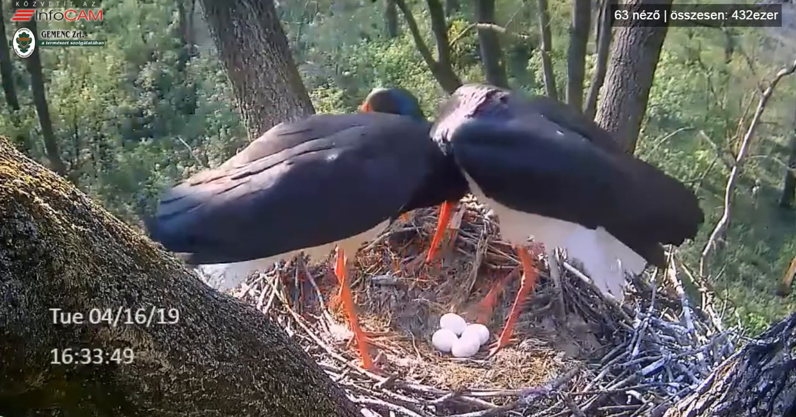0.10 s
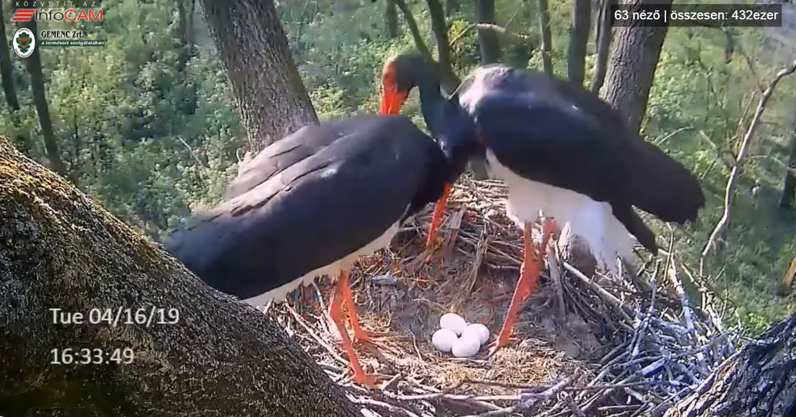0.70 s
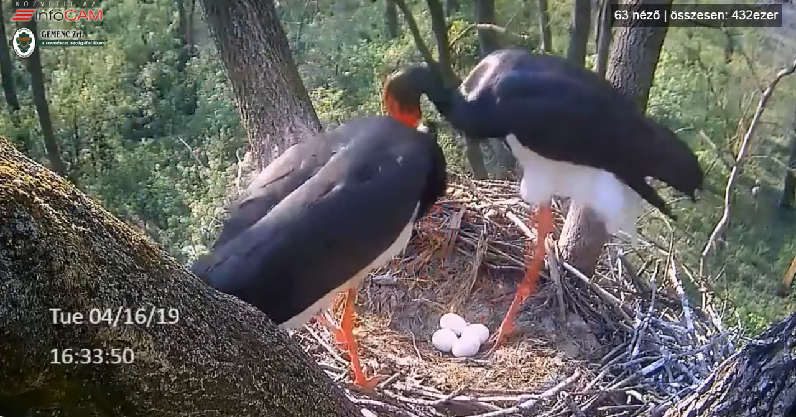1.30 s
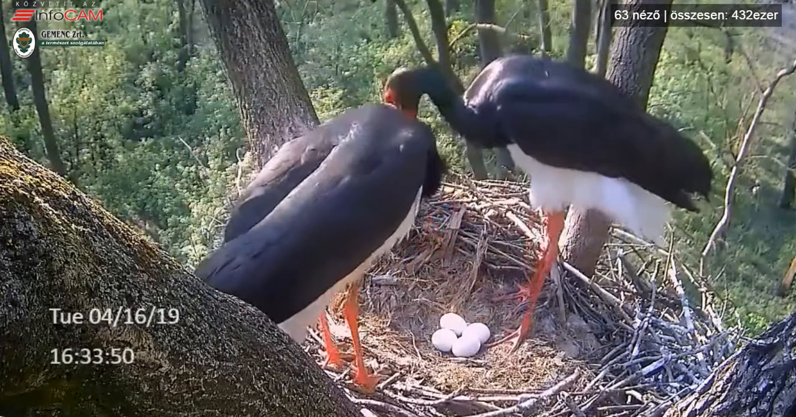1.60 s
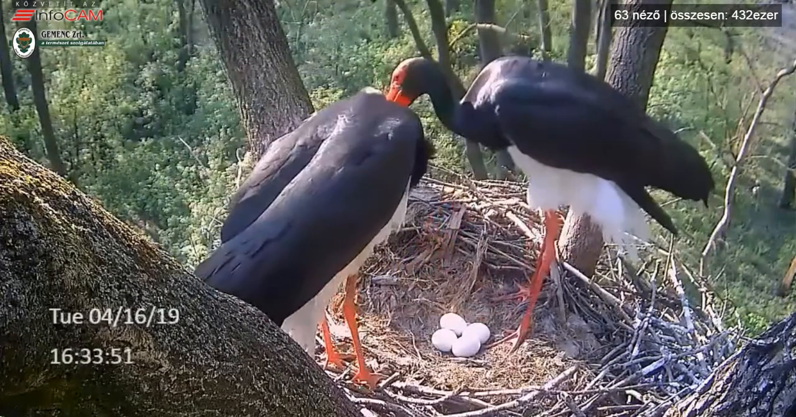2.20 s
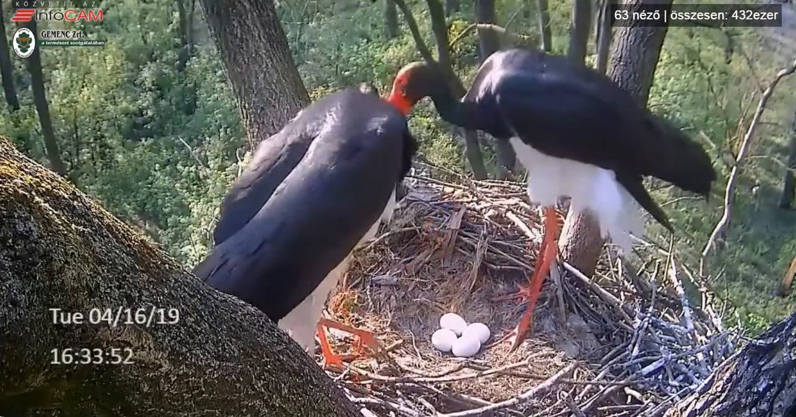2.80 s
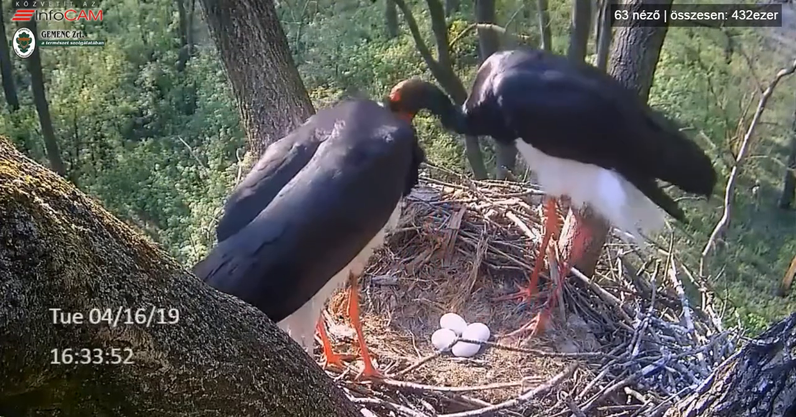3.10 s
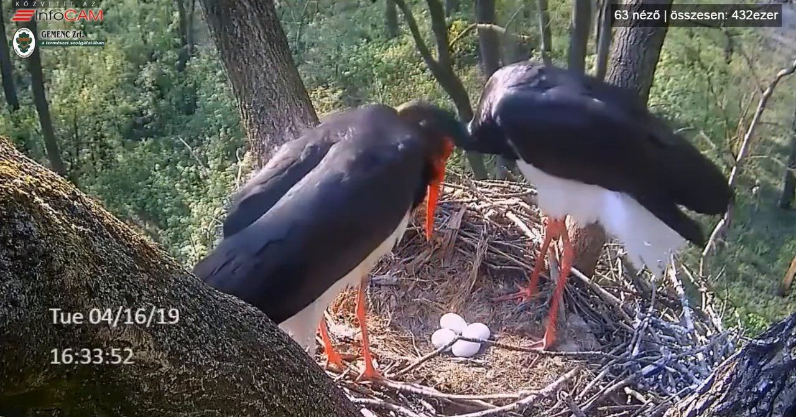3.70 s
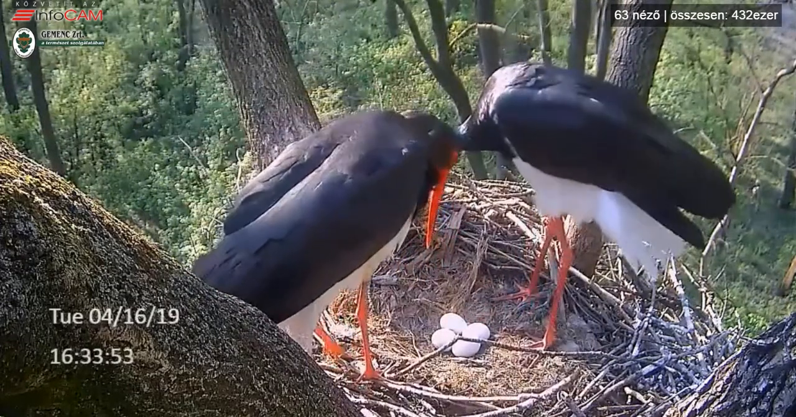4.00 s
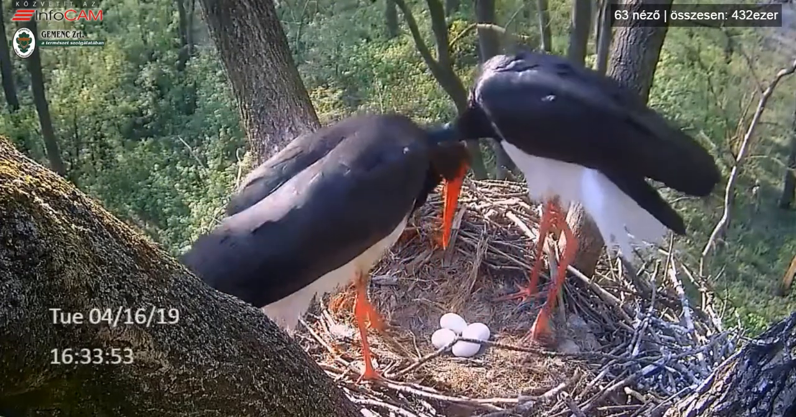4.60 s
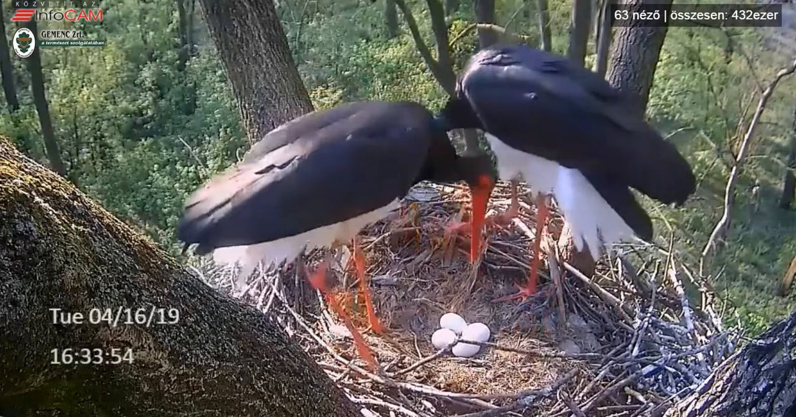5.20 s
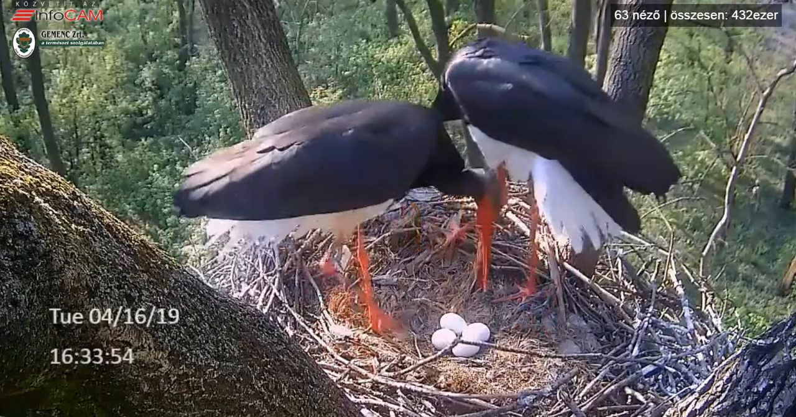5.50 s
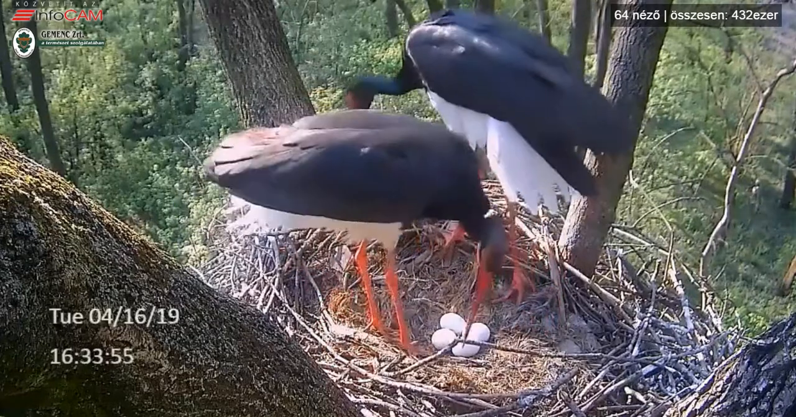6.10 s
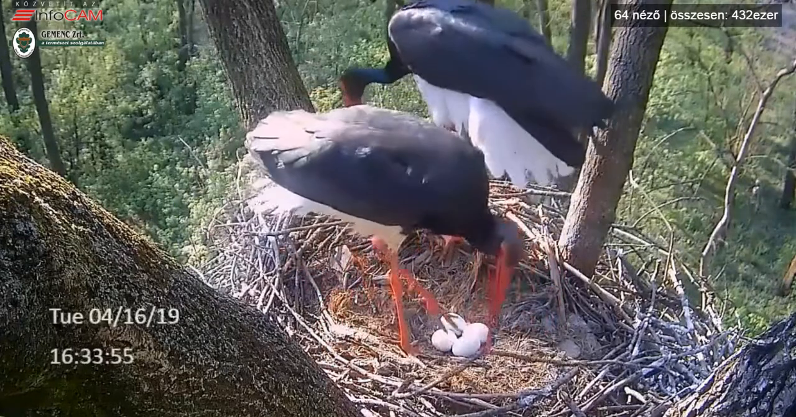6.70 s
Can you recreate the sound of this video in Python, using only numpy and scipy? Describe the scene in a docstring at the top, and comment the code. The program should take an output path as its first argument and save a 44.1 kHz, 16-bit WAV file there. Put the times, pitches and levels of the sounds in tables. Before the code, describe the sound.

Two black storks squeal and wheeze close by, in shrill, slightly distorted whistles over steady forest hiss and a faint electrical buzz.

```python
"""Two black storks greet each other on their nest with wheezy squeals that rise, flip up twice and fall back.
Their voice boxes whistle, and air hisses through their throats between and under the notes.
Behind them the forest rustles, something drones far away and the mains electricity buzzes faintly.
The birds overload a nest microphone: it distorts lopsidedly, and it samples so slowly
that high overtones fold down to lower pitches."""
import sys
import numpy as np
from scipy import signal
from scipy.fft import rfft, irfft
from scipy.io import wavfile
from scipy.ndimage import uniform_filter1d, map_coordinates

SR = 44100
rng = np.random.default_rng(int(sys.argv[2]) if len(sys.argv) > 2 else 0)


def output_pcm(signal):
    """Save a mono or channel-first signal as 16-bit PCM at the path in sys.argv[1].

    Samples are clipped to [-1, 1] before scaling.
    """
    pcm = np.clip(np.atleast_2d(signal).T, -1, 1) * 32767
    wavfile.write(sys.argv[1], SR, np.round(pcm).astype(np.int16))


N = 306054
TIME = np.arange(N) / SR
PROGRESS = np.linspace(0, 1, num=61)  # from the start of a note to its end
MIC_RATE_HZ = 8000


def gain(db):
    """Turn decibels into a factor to multiply by."""
    return 10 ** (np.asarray(db) / 20)


def normalise(x):
    """Scale a signal to an average power of 1."""
    return x / np.sqrt(np.mean(x ** 2))


def phase(hz):
    """The angle that a vibration has reached as its pitch moves."""
    return 2 * np.pi * np.cumsum(hz) / SR


def sine(hz):
    """A pure tone with an average power of 1."""
    return np.sqrt(2) * np.sin(phase(hz))


def gain_at(spectrum, hz):
    """Look up gains in a table of (frequency [Hz], level [dB])."""
    freqs, db = np.transpose(spectrum)
    return gain(np.interp(np.log(hz + 1), np.log(freqs), db))


def wobble(rate):
    """A smooth random wander of about 1 that changes about `rate` times a second."""
    points = rng.standard_normal(N // 4)
    return normalise(map_coordinates(points, [TIME * rate], order=2, mode="wrap"))


def noise_band(centre_hz, width_hz):
    """A hiss gathered around a pitch that may move."""
    gentle = signal.butter(1, width_hz / 2, fs=SR, output="sos")
    steep = signal.butter(2, min(2 * width_hz, SR / 3), fs=SR, output="sos")
    a, b = signal.sosfilt(np.vstack([gentle, steep]), rng.standard_normal((2, N)))
    angle = phase(centre_hz * np.ones(N))
    return normalise(a * np.cos(angle) + b * np.sin(angle))


# Tone colour of leaves and distant air: (frequency [Hz], relative level [dB])
RUSTLE_COLOUR = [(20, 6), (60, -2), (200, -1.5), (1000, -3.5), (2000, -4.5), (3000, -5.5), (4000, 1)]
def forest_rustle(level_db):
    """Leaves and air make an even noise that barely swells."""
    lowpass = signal.butter(10, MIC_RATE_HZ / 2, fs=SR, output="sos")
    noise = signal.sosfilt(lowpass, rng.standard_normal(N))
    leaves = irfft(rfft(noise) * gain_at(RUSTLE_COLOUR, np.fft.rfftfreq(N, 1 / SR)), N)
    return normalise(leaves) * gain(level_db + 0.22 * wobble(11))


# How loud the drone is: (time [s], level [dB])
DRONE_SWELL = [(0, -55), (.55, -54), (.8, -51.5), (1.35, -48.5), (2.3, -45), (6.9, -52)]
def far_drone(pitch_hz):
    """One low, distant tone swells and slowly sinks."""
    level_db = np.interp(TIME, *np.transpose(DRONE_SWELL))
    return gain(level_db) * sine(pitch_hz + 1.03 * wobble(5.4))


# Sizzles in each mains cycle: (place [share of cycle], width [share of cycle], level [dB])
SIZZLE_BURSTS = [(0.459, 0.039, -33.5), (0.954, 0.028, -34.5)]
# Steady electrical hum and whine: (pitch [Hz], level [dB])
HUM_TONES = [(48.4, -56), (249.5, -59.5), (571.9, -60), (3875, -55), (3994, -52)]
def mains_buzz(mains_hz, flicker_db):
    """Mains electricity leaks into the microphone line: a hum, and a sizzle in each half cycle."""
    bursts = np.zeros(N)
    for place, width, db in SIZZLE_BURSTS:
        distance = (TIME * mains_hz - place + .5) % 1 - .5
        bursts += gain(db) * np.exp(-.5 * (distance / width) ** 2)
    sizzle = bursts * noise_band(1700, width_hz=3300) * gain(flicker_db * wobble(100))
    hum = sum(gain(db) * sine(hz + .5 * wobble(3.24)) for hz, db in HUM_TONES)
    return sizzle + hum


# Pushes of air through the storks' throats: (start [s], swell [s], fade [s], strength [dB])
BREATH_PUSHES = [ (2.372, 0.018, 0.022, -24.5), (2.430, 0.095, 0.062, -16.5), (2.606, .024, 0.25, -18.5),
                 (2.762, 0.045, 0.084, -13.5), (2.863, 0.1, 0.067, -11.5), (3.038, 0.0083, 0.068, -14.5),
                 (3.089, 0.11, 0.12, -20), (3.378, 0.14, 0.15, -9.5), (3.600, 0.27, 0.14, -15),
                 (4.06, 0.17, 0.045, -16.5), (4.313, 0.16, .240, -17.5), (4.733, 0.13, 0.12, -17),
                 (4.995, 0.16, 0.047, -13), (5.170, 0.063, 0.17, -21), (5.390, 0.12, 0.14, -18.5),
                 (5.65, 0.059, 0.24, -15.5), (5.778, 0.095, 0.1, -8.5), (5.960, 0.26, 0.044, -11),
                 (6.274, 0.067, 0.17, -10), (6.510, 0.044, 0.17, -16), (6.700, 0.05, 1, -10.5)]
def airflow(lag_s=0.01):
    """Each push swells and fades; overlapping pushes add up, and the air follows a little late."""
    power = np.zeros(N)
    for start, swell, fade, db in BREATH_PUSHES:
        on = (TIME > start) & (TIME < start + swell + fade)
        age = TIME[on] - start
        push = np.sin(np.pi / 2 * np.interp(age, [0, swell, swell + fade], [0, 1, 0]))
        softness = np.where(age < swell, 0.32, 0.93)  # smaller is more abrupt
        power[on] += (gain(db) * push ** softness) ** 2
    carry_over = np.exp(-1 / (lag_s * SR))
    return signal.lfilter([1 - carry_over], [1, -carry_over], np.sqrt(power))


# How the throat rings in a wheeze: (time [s], sharp ring [Hz], lower hiss against that ring [dB])
WHEEZE_SHAPE = [(2.5, 3702, -5), (2.97, 3632, -5.5), (3.4, 3332, -6.5), (3.551, 3515, -13.5),
                (4.202, 3474, -10), (4.901, 3549, -11.5), (6.198, 3484, -10), (6.901, 3486, -15)]
def wheeze(sputter_db, high_db):
    """Sputtering air makes the throat ring sharply, with a broad hiss below and another above."""
    times, ring_hz, low_db = np.transpose(WHEEZE_SHAPE)
    # the narrow opening trembles, so the ring wanders
    ring = noise_band(np.interp(TIME, times, ring_hz) + 130 * wobble(45), width_hz=252)
    low = gain(np.interp(TIME, times, low_db)) * noise_band(2650, width_hz=900)
    high = gain(high_db) * noise_band(7800, width_hz=1220)
    sputter = gain(sputter_db * wobble(260) + 1.07 * wobble(55))
    return normalise(ring + low + high) * airflow() * sputter


# How the throat lifts or weakens each part of a squeal: (frequency [Hz], boost [dB])
THROAT_COLOUR = [(1100, -5.5), (1400, -11.5), (1750, -13.5), (2000, 0), (2400, -1.5), (2800, -13),
                 (3100, 5.5), (3550, 15.5), (3800, 3), (4100, -6), (4800, -15), (5300, -15), (6100, -9),
                 (6800, -19), (7600, -19), (8900, -1.5)]
def voice_box(notes, overtone_db, rasp_db, jitter, shimmer_db, fade_s):
    """Whistle each note (times, pitches, efforts): a tone and two overtones, shaped by the throat."""
    waver = 1 + jitter * wobble(700) + 0.0049 * wobble(110)
    flutter = gain(shimmer_db * wobble(400) + 1.47 * wobble(70))
    rasp = gain(rasp_db + 6.4 * wobble(40)) * noise_band(7600, width_hz=1640)
    rasp *= (airflow() / gain(-15.5)) ** 0.66  # hoarser when more air leaks past
    harmonic = np.arange(1, 4)[:, None]
    voice = np.zeros(N)
    for times, hz, effort_db in notes:
        on = (TIME > times[0]) & (TIME < times[-1])
        t = TIME[on]
        pitch = np.interp(t, times, hz)
        strengths = gain_at(THROAT_COLOUR, harmonic * pitch) * gain(overtone_db * (harmonic - 1) ** 2)
        tone = np.sqrt(2) * np.sum(strengths * np.sin(harmonic * phase(pitch * waver[on])), axis=0)
        hoarseness = rasp[on] * np.linalg.norm(strengths, axis=0)
        fade = np.clip(np.minimum(t - times[0], times[-1] - t) / fade_s, 0, 1)
        voice[on] += (tone + hoarseness) * fade * gain(np.interp(t, times, effort_db))
    return voice * flutter


# Soft, level peeps: (start [s], length [s], highest pitch [Hz], effort [dB])
SOFT_PEEPS = [(3.844, 0.083, 1450, -13), (4.796, .195, 1391, -13), (5.320, .2, 1421, -12.5),
              (5.480, 0.22, 1440, -11.5)]
# Short sighs: (start [s], length [s], effort [dB])
FALLING_SIGHS = [(3.269, 0.05, -16), (4.015, 0.038, -13.5), (4.682, 0.034, -14), (5.988, 0.0313, -8.5)]
def soft_notes():
    """Peeps droop at both ends; sighs slide down and fade as the pressure runs out."""
    droop = np.abs(2 * PROGRESS - 1) ** 2.76
    for start, length, hz, db in SOFT_PEEPS:
        yield start + length * PROGRESS, hz - 115.4 * droop, db - 9.5 * droop
    sigh_hz = np.interp(PROGRESS, [0, 1], [1410, 1183])
    for start, length, db in FALLING_SIGHS:
        yield start + length * PROGRESS, sigh_hz, db - 14.5 * PROGRESS


# Squeals in one arch: (start [s], rise [s], fall [s], first pitch [Hz], crest pitch [Hz],
# last pitch [Hz], effort [dB], effort lost at the ends [dB], bluntness [1 pointed, 3 flat-topped])
ARCHES = [ (2.604, .044, .016, 1251, 1845, 1880, -26, 2.2, 1.6),
          (2.642, 0.059, 0.029, 2080, 2330, 2400, -9, 18, 3.1),
          (2.708, 0.014, 0.076, 2520, 2618, 2112, 2.5, 31, 1.82),
          (2.800, 0.15, 0.069, 1719, 2057, 1850, -18.5, 12, 1.7),
          (3.048, 0.088, 0.12, 2120, 2448, 1998, -1, 27.6, 3.24),
          (3.585, .090, 0.063, 1880, 2244, 2060, -14.5, 12, 1.7),
          (3.719, 0.039, 0.041, 2135, 2300, 1990, -11.5, 23, 2.1),
          (6.012, 0.13, 0.086, 1920, 2420, 1690, -8.5, 23.5, 1.25),
          (6.598, .082, 0.089, 2174, 2417, 2136, -2.5, 28, 2.54)]
def arched_notes():
    """Pitch and effort rise to a crest; then the effort falls away, and usually the pitch too."""
    for start, rise, fall, first_hz, crest_hz, last_hz, db, lost_db, bluntness in ARCHES:
        age = (rise + fall) * PROGRESS
        slack = np.interp(age, [0, rise, rise + fall], [1, 0, 1]) ** bluntness
        end_hz = np.where(age < rise, first_hz, last_hz)
        effort_db = db - lost_db * slack ** 1.19  # effort holds a little longer than pitch
        yield start + age, crest_hz + (end_hz - crest_hz) * slack, effort_db


def bend(points):
    """A smooth curve through a note's first, halfway and last value."""
    return np.polyval(np.polyfit([0, .5, 1], points, 2), PROGRESS)


# Squeals that flip: (start [s], five note lengths [s], five efforts [dB], middle and top retuning [Hz])
FLIPS = [ (3.678, (.072, 0.058, 0.086, 0.043, .074), (-15.5, -16, -12, -19.5, -18.5), (12.4, -38.5)),
         (4.324, (0.1, 0.11, 0.042, .035, 0.062), (-21, -11.5, -10, -13, -20), (45, -55.5)),
         (4.995, (0.083, 0.091, 0.074, 0.032, .090), (-18, -18, -12, -14, -19), (4.3, 6.4)),
         (5.651, (0.078, .087, 0.091, 0.032, 0.052), (-14.5, -6, -12.5, -5.5, -13), (10.3, 10.7)),
         (6.286, (0.075, 0.075, 0.1, 0.036, .058), (-15, -4, -10.5, -6, -12.5), (-67.5, -15))]
# The five notes they share: (first, halfway and last pitch [Hz], first, halfway and last effort [dB])
FLIP_NOTES = [ ((1745, 1915, 2022), (-9.5, 4.5, -5.5)), ((2235, 2365, 2519), (-4, 1.4, -1.5)),
              ((2969.5, 3065, 2966.5), (4.5, -1, 1.5)), ((2430, 2315, 2215), (2.5, 0.67, -6.5)),
              ((1949.5, 1785.5, 1629), (1, -4, -16.5))]
def flipping_notes(scoop_hz=256.9, scoop_db=4, scoop_s=.008):
    """Each squeal slides in from below, then the voice jumps: low, middle, top, middle, low."""
    for onset, lengths, efforts, (middle_hz, top_hz) in FLIPS:
        shifts_hz = (0, middle_hz, top_hz, middle_hz, 0)
        start = onset
        for length, effort, shift, (hz, db) in zip(lengths, efforts, shifts_hz, FLIP_NOTES):
            times = start + length * PROGRESS
            scoop = np.exp(-(times - onset) / scoop_s)
            yield times, bend(hz) + shift - scoop_hz * scoop, bend(db) + effort - scoop_db * scoop
            start = times[-1]


def scene():
    """Both birds close to the microphone, the forest behind."""
    flipping = voice_box(flipping_notes(), overtone_db=-3, rasp_db=-19,
                         jitter=0.0069, shimmer_db=0.3, fade_s=0.0016)
    arched = voice_box(arched_notes(), overtone_db=-2, rasp_db=-17.5,
                       jitter=0.01143, shimmer_db=0.8, fade_s=0.002)
    soft = voice_box(soft_notes(), overtone_db=-4.5, rasp_db=-35.5,
                     jitter=0.018, shimmer_db=0.5, fade_s=0.0023)
    breath = wheeze(sputter_db=0.76, high_db=-16)
    storks = gain(1.5) * flipping + gain(-0.24) * arched + gain(0.4) * soft + gain(-0.44) * breath
    forest = forest_rustle(level_db=-42.5) + far_drone(pitch_hz=187.8)
    return (forest + mains_buzz(mains_hz=50, flicker_db=1.6) + storks)[None]


def round_peaks(x, ceiling, sharpness):
    """Squash a wave so that it stays under the ceiling."""
    return x / (1 + np.abs(x / ceiling) ** sharpness) ** (1 / sharpness)


def nest_microphone(sound, skew, knee):
    """Slow sampling folds overtones down; overload favours downward swings, which adds rumble."""
    count = round(N * MIC_RATE_HZ / SR)
    slow = map_coordinates(sound, [np.arange(count) * N / count], order=3, mode="nearest")
    lopsided = slow - skew * (np.hypot(slow, knee) - knee)
    squashed = round_peaks(lopsided, ceiling=1, sharpness=4)
    return signal.sosfilt(signal.butter(1, 14, "high", fs=MIC_RATE_HZ, output="sos"), squashed)


# The filter that smooths the slow samples: (frequency [Hz], boost [dB])
PLAYBACK_FILTER = [(2000, 2.5), (3000, 1.5), (4000, -4.5), (5000, -11), (6000, -23.5), (6600, -36.5),
                   (8000, -75), (10000, -33.5), (11000, -26), (12000, -25.5), (13000, -30), (14000, -39),
                   (15500, -69)]
def playback(slow):
    """Imperfect smoothing lets mirror images of the sound into the treble; loud peaks are clipped."""
    hz = np.fft.rfftfreq(N, 1 / SR)
    mirrored = np.fft.fft(slow)[np.arange(len(hz)) % len(slow)] * N / len(slow)
    smoothed = irfft(mirrored * gain_at(PLAYBACK_FILTER, hz), N)
    return round_peaks(smoothed, ceiling=np.where(smoothed > 0, .93, .86), sharpness=24)


def record(dry):
    """The sound passes through microphone and playback, and a fine fizz rides on the loud parts."""
    played = playback(nest_microphone(dry[0], skew=0.81, knee=0.52))
    power = uniform_filter1d(played ** 2, size=600)
    fizz = gain(-24.5) * power * rng.standard_normal(N)
    treble_cut = signal.ellip(12, .2, 90, 15700, fs=SR, output="sos")
    return signal.sosfilt(treble_cut, played + fizz)[None]


dry = scene()
out = record(dry)
output_pcm(out)
```